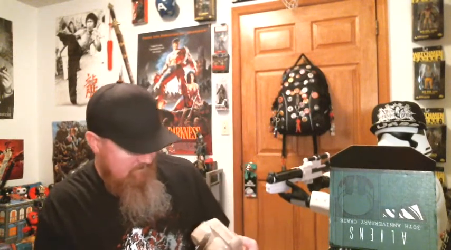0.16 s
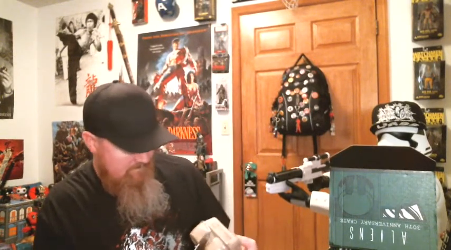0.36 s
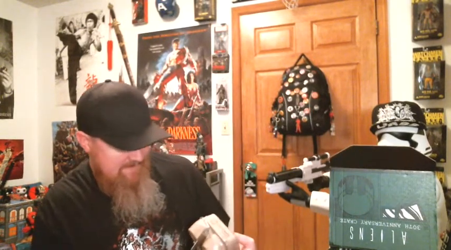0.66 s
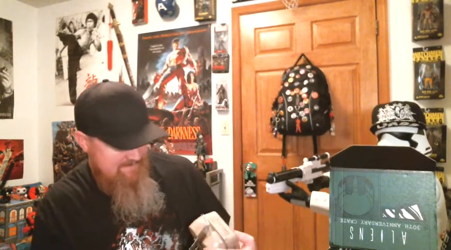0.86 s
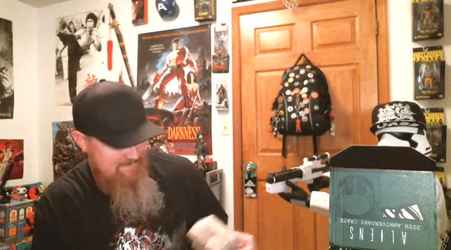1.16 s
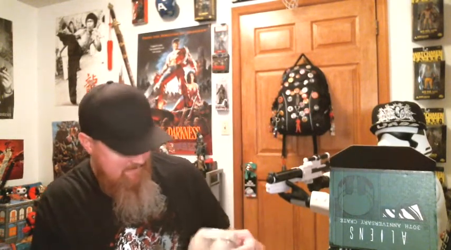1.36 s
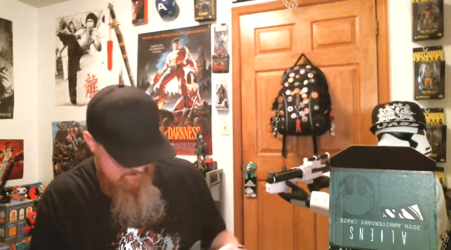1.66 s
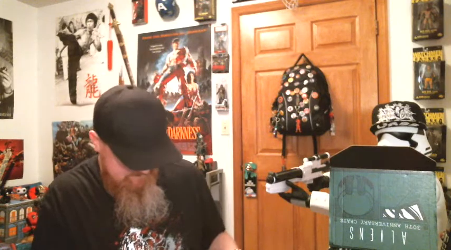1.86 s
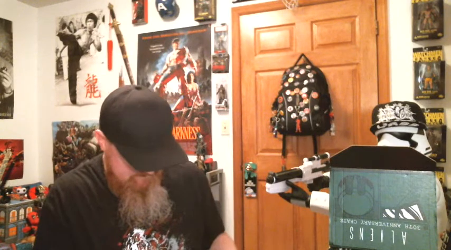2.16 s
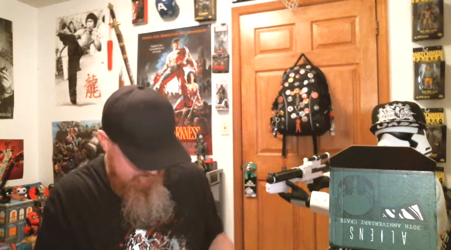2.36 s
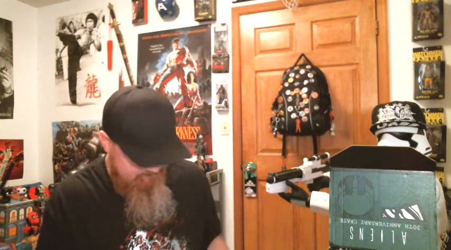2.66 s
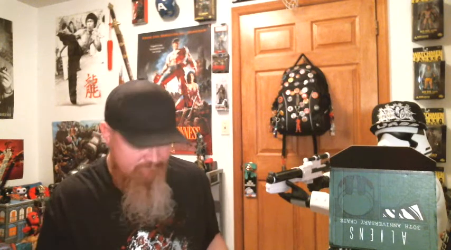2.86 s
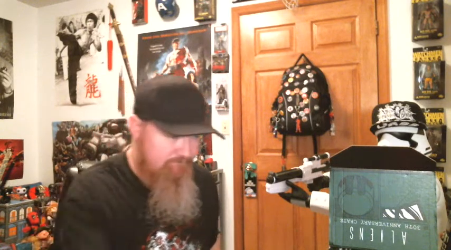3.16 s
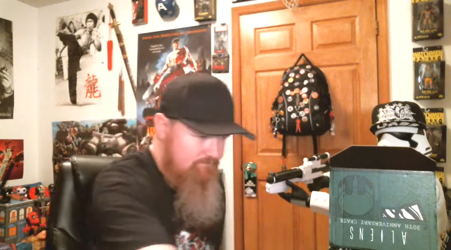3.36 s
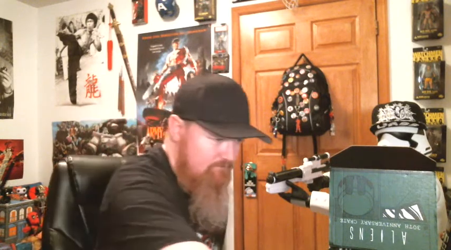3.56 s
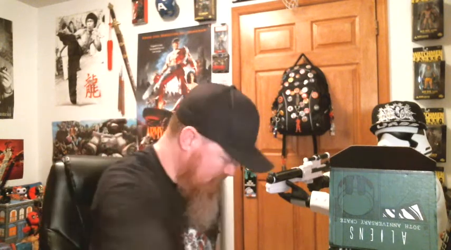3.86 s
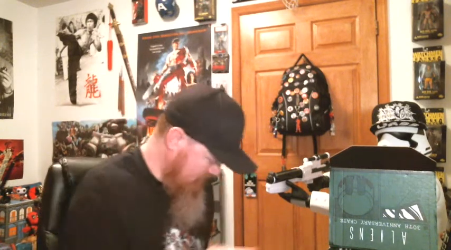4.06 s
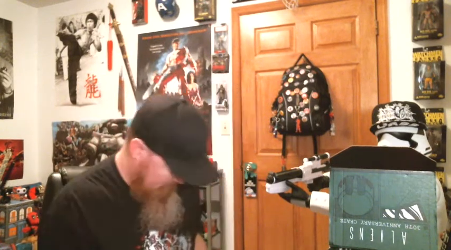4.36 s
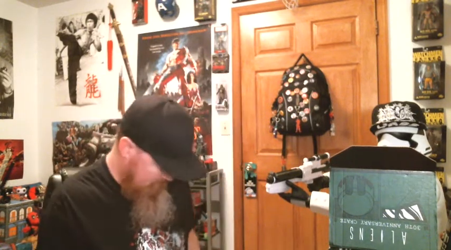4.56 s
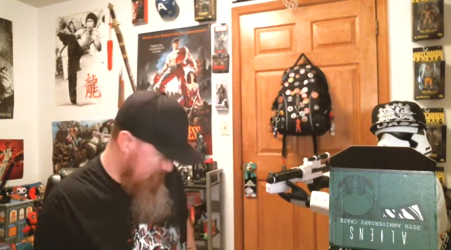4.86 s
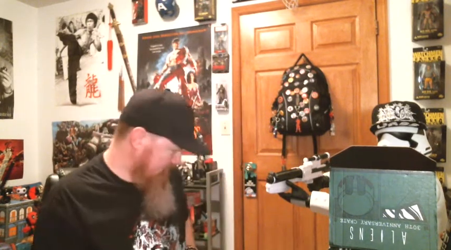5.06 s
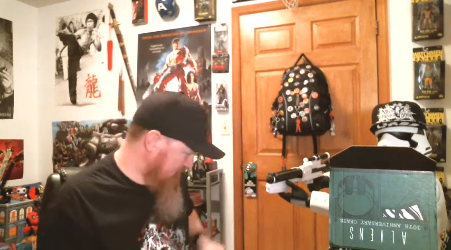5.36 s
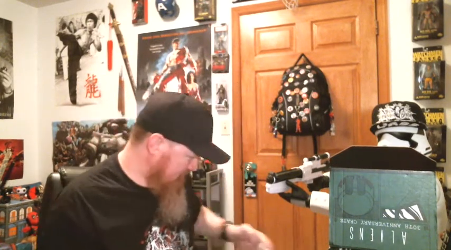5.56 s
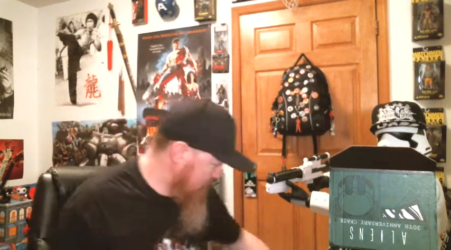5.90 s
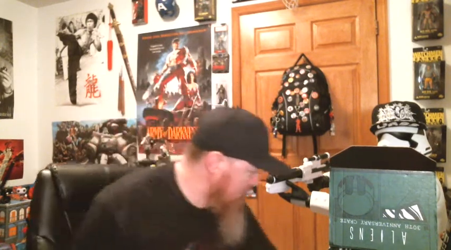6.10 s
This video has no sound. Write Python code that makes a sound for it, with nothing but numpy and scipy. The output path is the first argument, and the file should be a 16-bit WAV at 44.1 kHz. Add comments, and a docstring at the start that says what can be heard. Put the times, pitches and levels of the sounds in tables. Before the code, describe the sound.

Close, dry handling of a cardboard carton in a small furnished room with very faint hush. From 0 to 0.9 s there are only sparse, bright little creases and ticks. At about 1.02 s the flap tears loose in one violent, broad crack, several steps within a hundredth of a second, briefly clipping, with a low thump beneath and a short room tail. Light ticks follow until 1.9 s. The first bout of crisp crinkling and crunching runs about 1.9 to 2.7 s, strongest around 2.1 to 2.4 s. It thins to isolated clicks, with soft low knocks around 3.4 to 4.0 s. From about 4.2 s a longer, denser crinkle builds, with sharp snaps near 4.5, 4.7 and 5.3 s, crackling busily to 5.9 s. Short, airy, pitched card scrapes cluster from 5.85 to 6.15 s, with a last faint knock.

```python
"""At a desk in a little furnished room, a small cardboard carton is handled close to one microphone.
Its flap tears open with one loud crack, made of decaying noise bursts that briefly overload the input.
The packaging crinkles and crunches in two bouts: random ticks in bands, plus single creases that ring.
Low thuds and knocks are damped modes; now and then, mostly near the end, card slides on card, as tuned noise.
Changing reflections and a faint room hush surround it all."""
import sys
import numpy as np
from scipy import signal
from scipy.fft import rfft, irfft, next_fast_len
from scipy.io import wavfile
from scipy.ndimage import uniform_filter1d

SR = 44100
rng = np.random.default_rng(int(sys.argv[2]) if len(sys.argv) > 2 else 0)


def generate_wav(signal):
    """Clip the signal to [-1, 1] and save it as 16-bit WAV at the path in sys.argv[1]."""
    frames = np.transpose(np.atleast_2d(signal))
    scaled = np.clip(frames, -1, 1) * 32767
    pcm = np.round(scaled).astype(np.int16)
    wavfile.write(sys.argv[1], SR, pcm)


N = 274787
TIME = np.arange(N) / SR
GATE_DEPTH_DB = 7


def from_db(db):
    """Decibel law for amplitude: 20 dB is a factor of ten."""
    return 10 ** (np.asarray(db) / 20)


def rms_one(x):
    """Normalisation to unit root-mean-square amplitude."""
    return x / np.sqrt(np.mean(x ** 2) + 1e-20)


def at_hz(points, hz):
    """Interpolation of a curve along logarithmic frequency."""
    points = np.array(points)
    return np.interp(np.log(np.maximum(hz, 1e-3)), np.log(points[:, 0]), points[:, 1])


def add(track, s, sound):
    """Superposition: a sound is summed into the track at a time in seconds."""
    start = max(round(s * SR), 0)
    track[start:start + len(sound)] += sound[:N - start]


def coloured(x, spectrum, pitch_hz=1):
    """Minimum-phase filtering: a causal response with the given spectrum; the energy is kept."""
    size = 2 * next_fast_len(len(x))
    gain_db = at_hz(spectrum, np.fft.rfftfreq(size, 1 / SR) / pitch_hz)
    cepstrum = irfft(np.log(from_db(gain_db)))
    # folding the cepstrum onto positive time makes the response causal
    cepstrum[1:size // 2] *= 2
    cepstrum[size // 2 + 1:] = 0
    response = np.exp(rfft(cepstrum))
    filtered = irfft(rfft(x, size) * response)[:len(x)]
    return rms_one(filtered) * np.sqrt(np.mean(x ** 2))


def burst(length_s, count=6):
    """Impulsive fracture: fibres give way in a toneless crack that decays exponentially."""
    fade = np.exp(-TIME[:SR // 10] / length_s)
    crack = rng.standard_normal(len(fade)) * fade
    for _ in range(count):   # equal energy at every frequency, kept inside the fade
        flat = irfft(np.exp(1j * np.angle(rfft(crack))), len(fade))
        crack = flat * np.minimum(10 * fade, 1)
    return rms_one(crack) * np.sqrt(np.mean(fade ** 2))


def drift(per_s):
    """Random modulation: straight lines join chance values, so many a second, with RMS 1."""
    knots = rng.standard_normal(4000)
    return rms_one(np.interp(TIME * per_s, np.arange(len(knots)), knots))


# Spectrum of the room's hush: frequency_hz [Hz], relative_level_db [dB]
HUSH_COLOUR = [(18, -34.5), (30, -25.5), (171, -8.5), (240, -8), (346, -11.5), (437, -12), (497, -13.5),
               (3320, -25), (15000, -34.5)]


def hush(before_gate_db=-73.5):
    """Stationary background noise: filtered noise of constant level, set before the gate."""
    return from_db(before_gate_db) * coloured(rng.standard_normal(N), HUSH_COLOUR)


def squeeze_envelope(start, held):
    """Exponential attack and release: a swell rises quickly, holds, and falls away."""
    rise_db_per_s, release_db_per_s = 1099.5, 750.5
    before, after = np.clip(start - TIME, 0, 1), np.clip(TIME - start - held, 0, 1)
    return from_db(-rise_db_per_s * before - release_db_per_s * after)


# Spectrum of crinkling packaging, shared with the creases: frequency_hz [Hz], relative_level_db [dB]
PAPER_COLOUR = [(71, -60.5), (120, -28.5), (230, -22.5), (398, -9.5), (478, -2.5), (718, -8), (795, 0),
                (954, -4), (1550, -2.5), (4750, 0), (10500, -3), (15400, -24)]
# Short swells of crackle in the packaging, one row for each, before the trims of crinkle():
# start_s [s], held_s [s], level_db [dB], body_db [dB relative to the crackle]
SQUEEZES = [(0.0, 0.041, -60, -9), (0.979, 0.0098, -58, 8), (1.78, 0.12, -63, -38),
            (1.928, 0.041, -51, -3.5), (2.097, 0.13, -54.5, 15.5), (2.145, 0.16, -39, -11),
            (2.229, 0.029, -26.5, -7.5), (2.345, 0.033, -40.5, -13), (2.409, 0.29, -52.5, -33),
            (2.565, 0.061, -48, 1), (2.836, 0.059, -65, 2), (2.908, 0.048, -42.5, -7.5),
            (3.362, 0.0036, -53.5, -8), (3.795, 0.027, -50.5, -2), (3.882, 0.023, -53.5, -27),
            (3.948, .04, -41, -9), (4.041, 0.092, -53.5, -20.5), (4.183, 0.45, -44.5, -5),
            (4.42, 0.054, -39, -6), (4.595, 0.066, -43, -3), (4.733, 0.057, -36.5, -3.5),
            (4.829, 0.22, -42.5, -3), (5.073, 0.034, -40.5, 3.5), (5.149, 0.069, -38, -3),
            (5.28, 0.117, -36, -9), (5.336, 0.022, -31.5, -4.5), (5.42, 0.23, -37, -11),
            (5.583, 0.029, -30, -17.5), (5.648, 0.15, -42.5, -40), (5.754, .03, -34, -11.5),
            (5.788, 0.032, -30.5, -13), (5.846, 0.02, -36, -24), (5.943, 0.011, -44, -20.5),
            (6.034, 0.12, -48.5, -13)]
# Louder swells have more crackle over middle [dB per dB of level above the usual, dB]
BRIGHTENING, USUAL_SQUEEZE_DB = 0.12, -43.5


def crinkle(per_s=330, spread_db=2.0, crackle_db=-1, middle_db=0.1, body_db=6, facets_per_s=45):
    """Crackling noise: hundreds of tiny folds give way each second over sheet-on-sheet friction."""
    tick_s, facet_db, friction = .0013, 3.0, .22   # decay time, resonance drift, RMS against the ticks
    happens = rng.random(N) < per_s / SR
    sizes = happens * from_db(spread_db * np.minimum(rng.exponential(1, N), 3.5))
    power = signal.lfilter([1], [1, -np.exp(-2 / (tick_s * SR))], sizes ** 2 + 1e-12)
    # the hands set the pace at which stress is released, so the local mean power is evened out
    power /= uniform_filter1d(power, size=1200) + 0.2 * power.mean()
    ticks = coloured(rng.standard_normal(N) * np.sqrt(power + friction ** 2), PAPER_COLOUR)

    effort = np.array([squeeze_envelope(start, held) ** 2 for start, held, _, _ in SQUEEZES])
    colours = []
    for _, _, db, body in SQUEEZES:
        middle = db + middle_db - BRIGHTENING * (db - USUAL_SQUEEZE_DB)
        colours.append([(900, db + body + body_db), (2800, middle), (7000, db + crackle_db)])

    out, edges = np.zeros(N), np.geomspace(100, 17000, num=23)
    for k, (low, high) in enumerate(zip(edges, edges[1:])):
        band_filter = signal.butter(1, [low, high], "band", fs=SR, output="sos").repeat(2, axis=0)
        band = (-1) ** k * signal.sosfilt(band_filter, ticks)
        gains = from_db([at_hz(colour, np.sqrt(low * high)) for colour in colours])
        level = np.sqrt(gains ** 2 @ effort)   # the powers of the swells add
        # facets form and vanish, so resonances shift
        out += band * level * from_db(facet_db * drift(facets_per_s))
    return out


def buckle(length_s, creep_db=-21, creep_s=.003, after_db=-9, after_s=0.012):
    """Snap-through instability: a fold creeps, snaps, then settles with a smaller tick."""
    out = np.zeros(N)
    settle_s = creep_s + rng.uniform(.3, 1) * after_s
    for s, db in [(0, creep_db), (creep_s, 0), (settle_s, after_db)]:
        add(out, s, from_db(db) * burst(length_s))
    return out[:SR // 10], creep_s


# Single creases at set times, faint and loud, before the trims of creases():
# start_s [s], level_db [dB, peak], middle_db [dB relative to the peak], pitch_hz [Hz, ring of the facet]
CREASES = [(0.0402, -21.5, -27, 5530), (0.0524, -24, -14, 4550), (0.0932, -21.5, -13, 2700),
           (0.1402, -32.5, -32, 3020), (0.2718, -32.5, -34, 9000), (0.3376, -45, -22, 4850),
           (0.5763, -35.5, -26, 5600), (0.6002, -37, -10.5, 1880), (0.6361, -47, -15, 1920),
           (0.8934, -39.5, -21.5, 9050), (0.9842, -33, -25, 4040), (1.1856, -27.5, -27, 5500),
           (1.2974, -37, -21, 5380), (1.3923, -34, -24.5, 2940), (1.4895, -40.5, -25, 2950),
           (1.502, -35.5, -15.5, 2900), (1.6446, -21.5, -28, 10970), (1.769, -21.5, -31.5, 6650),
           (1.8761, -37, -23, 3460), (1.9385, -25, -25, 10300), (1.9654, -23, -18.5, 3700),
           (1.9949, -28, -44, 10200), (2.0193, -25.5, -41, 9400), (2.0413, -25.5, -20, 4430),
           (2.089, -23, -21, 4200), (2.1443, -10.5, -29, 9210), (2.1869, -13.5, -27, 10200),
           (2.2288, -14, -19, 4690), (2.2564, -11, -31, 4540), (2.3689, -14, -23.5, 2960),
           (2.4347, -20.5, -27.5, 8560), (2.5166, -21.5, -36, 5360), (2.5681, -24.5, -17, 1900),
           (2.6189, -21.5, -20.5, 5420), (2.6542, -18, -19, 10800), (2.7434, -29.5, -24.5, 3150),
           (2.8954, -30, -32, 4680), (3.024, -32.5, -21, 3780), (3.0965, -33.5, -27, 7050),
           (3.1332, -38.5, -17, 2000), (3.3586, -20, -23, 8900), (3.686, -24.5, -11, 5280),
           (4.1698, -24, -26, 5170), (4.3529, -21.5, -19, 5350), (4.417, -16, -23.5, 8500),
           (4.4715, -10.5, -23.5, 7270), (4.5356, -22, -20, 5350), (4.5849, -17.5, -28, 9300),
           (4.6158, -18, -25, 7380), (4.6879, -13, -24, 4100), (4.7316, -21, -37, 4790),
           (4.7985, -18.5, -20.5, 4530), (4.8999, -16.5, -25.5, 5030), (5.3327, -12, -35, 9500),
           (5.472, -14.5, -36, 8200)]
# Facets larger than the usual one ring more strongly and buckle more slowly
FACET_HZ, FACET_DB_PER_OCTAVE = 4940, 1
FACET_SLOWING = .3   # octaves of buckling time per octave of lower pitch


def creases(rows, length_s=0.0017, level_db=-6, middle_db=20, body_db=-5, ring_db=7, ring_octaves=0.17):
    """Buckling and local resonance: each fold ticks and rings in its own facet."""
    out, hz = np.zeros(N), np.geomspace(50, 20000, num=80)
    for s, db, middle, ring_hz in rows:
        # each row sets its own share of middle and body
        size = [(500, middle + middle_db + body_db), (2000, middle + middle_db), (6500, 0.001)]
        octaves_lower = np.log2(FACET_HZ / ring_hz)
        ring_peak_db = ring_db + FACET_DB_PER_OCTAVE * octaves_lower
        facet = ring_peak_db / (1 + (np.log2(hz / ring_hz) / ring_octaves) ** 2)
        colour = np.column_stack([hz, at_hz(PAPER_COLOUR, hz) + at_hz(size, hz) + facet])
        tick, lead_s = buckle(length_s * 2 ** (FACET_SLOWING * octaves_lower))
        add(out, s - lead_s, from_db(db + level_db) * coloured(tick, colour))
    return out


def stray_creases(count=8):
    """Poisson process: more creases give way at random while a swell is held; rows for creases()."""
    per_s, above_squeeze_db, spread_db = 30, 11, 5
    middle_db, ring_range_hz = -35, (2800, 10000)
    rows = []
    for start, held, db, _ in SQUEEZES:
        waits, sizes, facets = rng.exponential(1, count), rng.standard_normal(count), rng.random(count)
        for s, size, facet in zip(np.cumsum(waits) / per_s, sizes, facets):
            if s < held:
                ring_hz = np.interp(facet, [0, 1], ring_range_hz)
                rows.append((start + s, db + above_squeeze_db + spread_db * size, middle_db, ring_hz))
    return rows


# Low thuds and knocks, some of them under the creases:
# start_s [s], level_db [dB], pitch_hz [Hz, lower mode], upper_mode_db [dB relative to the lower mode]
BUMPS = [(0.096, -58, 355, 4), (0.641, -63.5, 450, -3), (0.801, -71, 480, 0), (1.024, -33, 207.4, -16),
         (1.093, -56, 168, -14), (1.238, -48.5, 310, -5.5), (1.315, -56.5, 298, -7.5),
         (1.506, -54, 241, -10), (2.239, -39.5, 307, 14), (3.401, -52, 126.6, -2.5),
         (3.684, -40.5, 300, 8.5), (3.81, -43.5, 198, -18), (3.849, -37, 293, -7), (3.88, -43.5, 290, -28),
         (4.005, -47, 245, -32), (4.272, -44.5, 190.6, 13.5), (4.59, -49, 244, -23), (4.766, -49, 278, -18),
         (4.993, -40.5, 516.5, 4.5), (5.258, -45, 206, -9), (6.139, -52, 487, -10)]
# Spectrum of one mode: pitch_multiple [times the mode's pitch], relative_level_db [dB]
KNOCK_COLOUR = [(.2, -29), (0.502, -11), (0.998, -0.5), (1.502, -8.5), (2.5, -23.5), (6.001, -46)]


def bumps(length_s=.009, upper_mode_ratio=2.34):
    """Modal superposition: two heavily damped modes; the upper one's strength differs from knock to knock."""
    out = np.zeros(N)
    for s, db, hz, upper_db in BUMPS:
        for mode_hz, mode_db in [(hz, 0), (hz * upper_mode_ratio, upper_db)]:
            add(out, s, from_db(db + mode_db) * coloured(burst(length_s), KNOCK_COLOUR, mode_hz))
    return out


# The flap letting go in quick steps: start_s [s], level_db [dB], length_s [s], top_hz [Hz, low-pass corner]
FLAP = [(1.024, -0.5, 0.0024, 14000), (1.0253, -1, 0.0012, 12000), (1.0294, -9.5, 0.00034, 5000),
        (1.0311, -2, 0.00069, 5000)]
# Spectrum of the tearing flap: frequency_hz [Hz], relative_level_db [dB]
FLAP_COLOUR = [(35, -65.5), (60, -49.5), (242, -12.5), (672, -5.5), (908, -6.5), (1230, -4), (1350, -9),
               (2770, -3), (3490, -2.5), (4110, 1), (9940, -2.5), (15400, -21.5)]


def flap():
    """Stepwise fracture: the locked flap tears free; its later steps are duller."""
    out = np.zeros(N)
    for s, db, length_s, top_hz in FLAP:
        low_pass = signal.butter(1, min(top_hz, .45 * SR), fs=SR)
        dulled = signal.lfilter(*low_pass, coloured(burst(length_s), FLAP_COLOUR))
        add(out, s, from_db(db) * dulled)
    return out


# Card sliding on card, before the trim of slides(): middle_s [s], length_s [s], level_db [dB], pitch_hz [Hz]
SLIDES = [(1.454, 0.073, -63.5, 1550), (2.838, 0.079, -59, 2064), (3.483, 0.024, -60, 1320),
          (5.101, 0.066, -49.5, 1022), (5.861, .035, -36, 3470), (5.946, 0.055, -37.5, 4600),
          (6.051, .05, -37, 3480), (6.077, 0.038, -42, 1950), (6.137, 0.03, -36, 5000)]
# Spectrum of a slide: pitch_multiple [times the pitch], relative_level_db [dB]
SLIDE_COLOUR = [(.3, -31), (.75, -8), (1, -0.5), (1.3, -14.5), (2, -12.5), (4, -65)]


def slides(level_db=-2):
    """Friction-driven resonance: noise swells and fades, and sings in the free edge of the card."""
    out = np.zeros(N)
    for s, length_s, db, hz in SLIDES:
        stroke = np.hanning(int(length_s * SR)) ** .5
        rub = coloured(rng.standard_normal(len(stroke)), SLIDE_COLOUR, hz)
        add(out, s - length_s / 2, from_db(db + level_db) * stroke * rub)
    return out


# Reverberation time of the room, for a decay of 60 dB: frequency_hz [Hz], t60_s [s]
ROOM_T60 = [(100, 0.39), (300, 0.26), (1000, 0.25), (4000, 0.21), (8000, 0.19), (14000, 0.23)]


def room_tail(first_wall_s=0.0018):
    """Exponential reverberant decay: a dense short tail of unit energy, at its longest in the bass."""
    t, edges = TIME[:SR // 2], np.geomspace(40, 20000, num=10)
    noise, hz = rfft(rng.standard_normal(len(t))), np.fft.rfftfreq(len(t), 1 / SR)
    tail = np.zeros(len(t))
    for low, high in zip(edges, edges[1:]):
        band = irfft(noise * ((hz >= low) & (hz < high)), len(t))
        tail += band * from_db(-60 * t / at_hz(ROOM_T60, np.sqrt(low * high)))
    tail *= np.minimum(t / first_wall_s, 1) ** 2
    return tail / np.linalg.norm(tail)


def room(x, wet_db, moves_per_s, count=8):
    """Direct and reverberant field: the sounding spot keeps moving, so the reflections keep changing."""
    shares = np.array([drift(moves_per_s) for _ in range(count)])
    shares /= np.linalg.norm(shares, axis=0)
    reflections = sum(signal.oaconvolve(x * share, room_tail())[:N] for share in shares)
    return x + from_db(wet_db) * reflections


def noise_gate(x, open_db=-78, slope=1.0, size=256):
    """Downward expansion: each band is turned down under the threshold, which cuts faint tails short."""
    bands = signal.stft(x, nperseg=size, noverlap=3 * size // 4)[2]
    power = uniform_filter1d(np.abs(bands) ** 2, size=5, axis=0)
    level_db = 10 * np.log10(np.maximum(power, 1e-16))
    gain = from_db(np.clip(slope * (level_db - open_db), -GATE_DEPTH_DB, 0))
    return signal.istft(bands * gain, nperseg=size, noverlap=3 * size // 4)[1][:N]


def scene():
    """Superposition of sources within arm's reach of the microphone, over the hush of the room."""
    rustle = room(crinkle() + slides(), wet_db=-2.0, moves_per_s=70)
    ticks = room(creases(CREASES) + creases(stray_creases()), wet_db=-1.0, moves_per_s=120)
    knocks = room(bumps(), wet_db=-3.0, moves_per_s=20)
    crack = room(flap(), wet_db=-3.0, moves_per_s=180)
    return (hush() + rustle + ticks + knocks + crack)[None]


def record(dry, low_cut_hz=70, cutoff_hz=15800):
    """Clipping and band-limiting: peaks clip at full scale, rumble and top are cut, quiet bands gated."""
    clipped = np.clip(dry[0], -1, 1)
    low_cut = signal.butter(2, low_cut_hz, "high", fs=SR, output="sos")
    gated = noise_gate(signal.sosfilt(low_cut, clipped))
    top_cut = signal.ellip(8, .3, 70, cutoff_hz, fs=SR, output="sos")   # 0.3 dB ripple, 70 dB stop band
    return signal.sosfilt(top_cut, gated)[None]


dry = scene()
out = record(dry)
generate_wav(out)
```